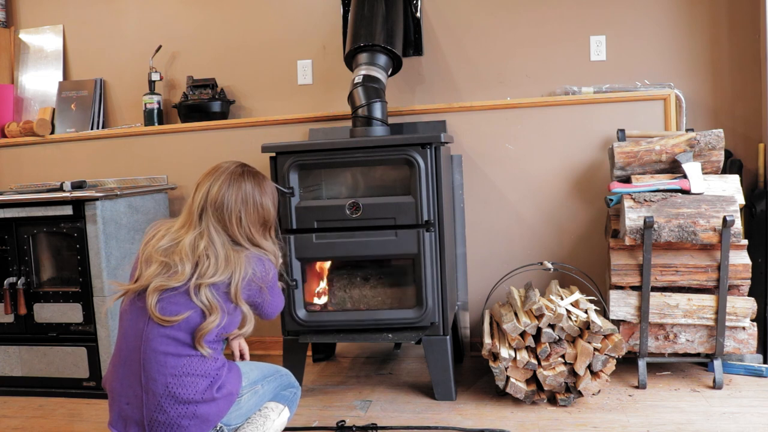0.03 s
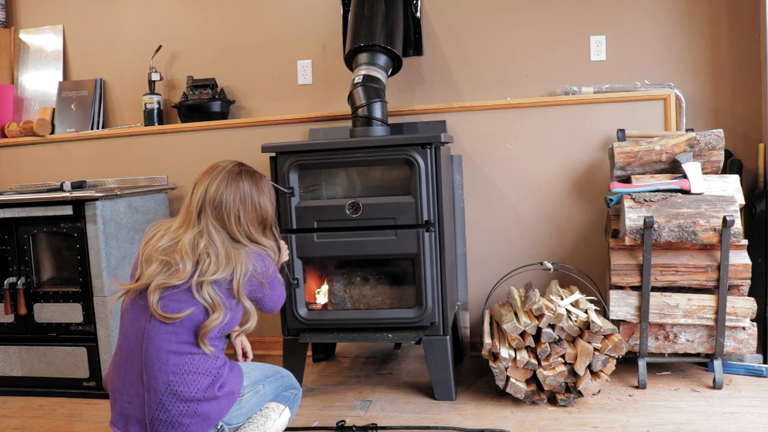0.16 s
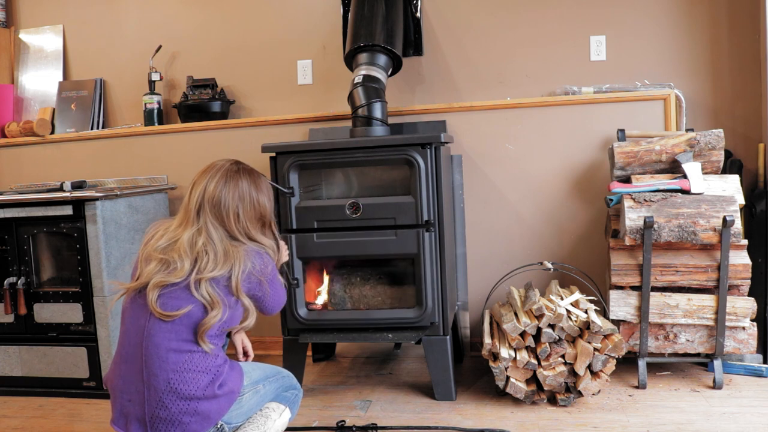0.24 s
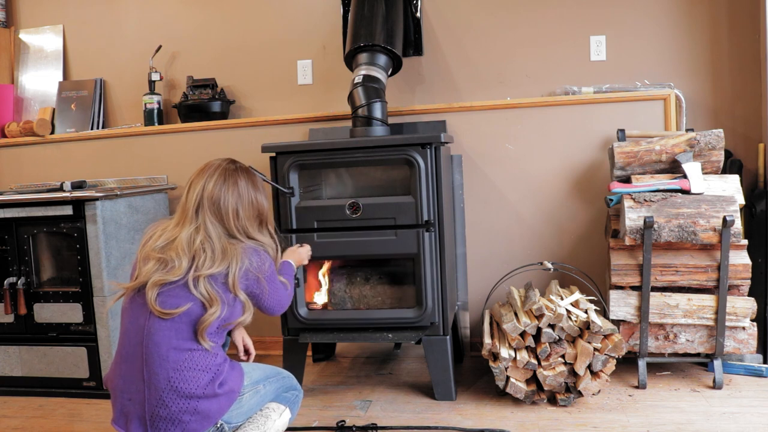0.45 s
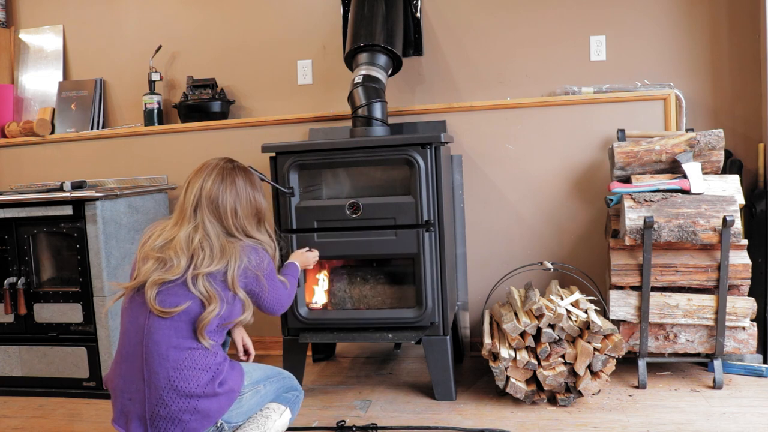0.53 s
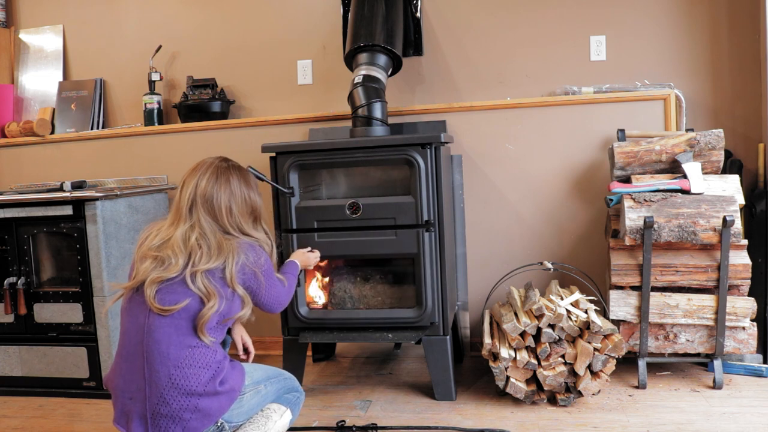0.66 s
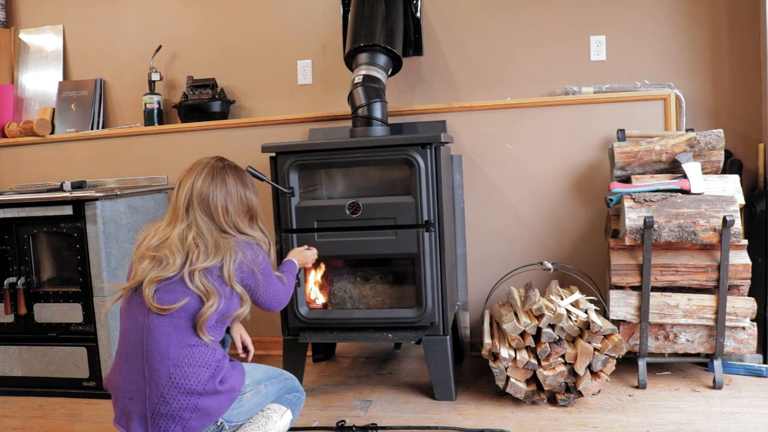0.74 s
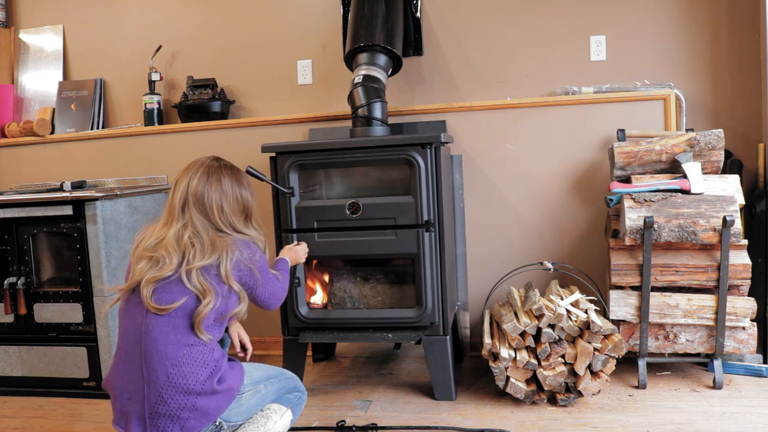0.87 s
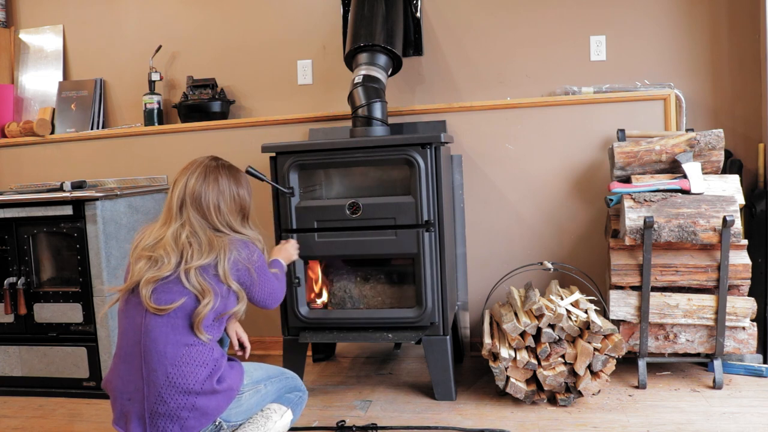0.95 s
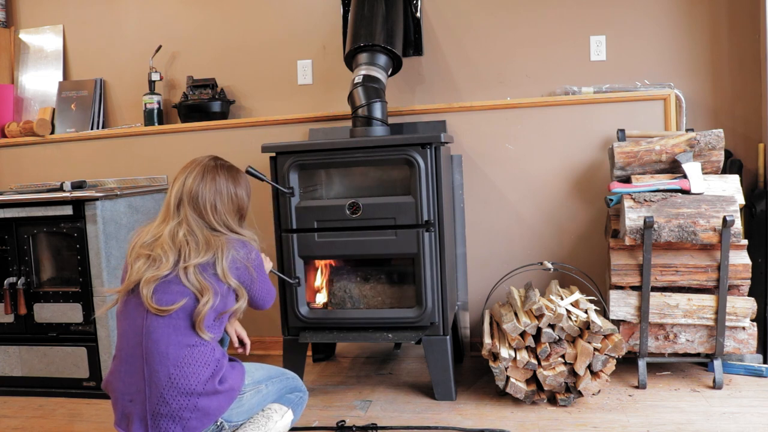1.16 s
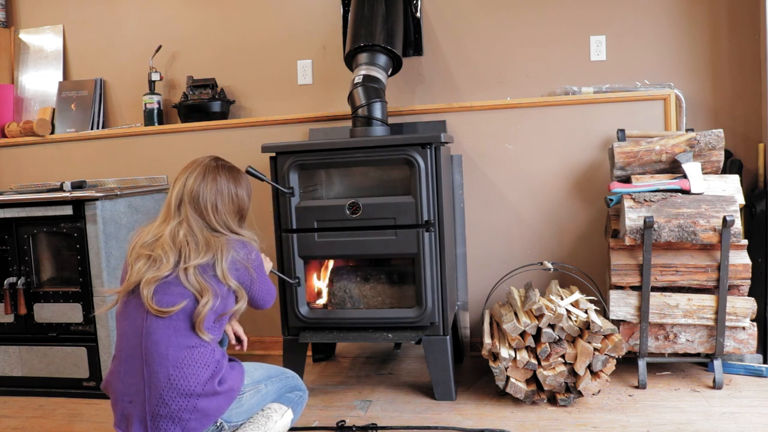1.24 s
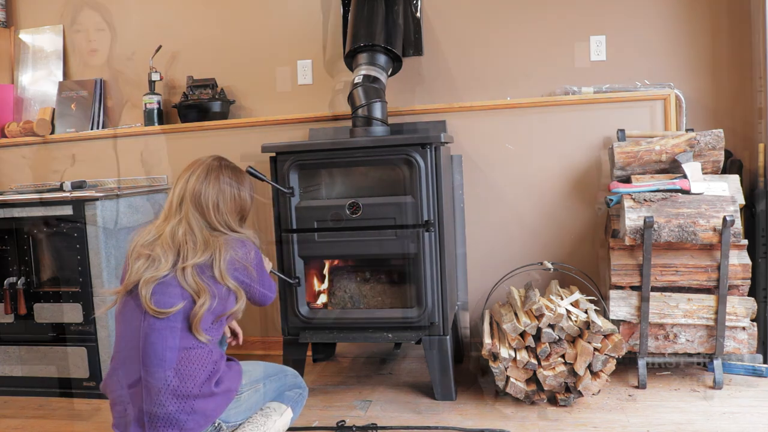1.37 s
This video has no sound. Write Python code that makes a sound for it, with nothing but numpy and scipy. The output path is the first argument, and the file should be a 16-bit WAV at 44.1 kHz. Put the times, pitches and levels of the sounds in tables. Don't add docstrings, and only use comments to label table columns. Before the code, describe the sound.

A heavy iron stove door slams at about 0.2 seconds, just after a faint handle tick: a loud crack, brief plate ring and low hollow firebox boom that lingers. The latch knocks sharply at 0.45. Small ticks and soft thuds come around 0.65 to 0.9, then a light ringing click at 1.2. Quiet living room air and soft fire draught underneath, close stereo pickup, loud blows briefly squashed.

```python
import sys
import numpy as np
from scipy import signal
from scipy.fft import rfft, irfft, next_fast_len
from scipy.io import wavfile
from scipy.ndimage import uniform_filter1d

SR = 44100
rng = np.random.default_rng(int(sys.argv[2]) if len(sys.argv) > 2 else 0)


def bounce(signal):
    frames = np.transpose(np.atleast_2d(signal))
    limited = np.clip(frames, -1, 1)
    pcm = np.round(limited * 32767).astype(np.int16)
    wavfile.write(sys.argv[1], SR, pcm)


def gain_from_decibels(decibels):
    exponent = np.asarray(decibels, float) / 20
    return 10 ** exponent


N = 61739

# freq_hz, density_db_per_hz
FLOOR_SPECTRUM = [(25, -18), (60, -3), (110, -8.5), (170, -8), (400, -13), (1200, -17), (2500, -26.5),
                  (9000, -36.5), (16500, -45)]
# freq_hz, likeness_0_to_1
LIKENESS = [(100, 0.98), (300, 0.98), (700, 0.71), (1500, 0.4), (4000, 0.03), (12000, .15)]
# freq_hz, t60_s
ROOM_T60 = [(200, 0.86), (1000, 0.63), (3000, 0.53), (8000, 0.42), (14000, 0.35)]
# freq_hz, level_db, width_hz, t60_s
FIREBOX_MODES = [(54.7, -4.5, 5.3, 0.92), (87.6, -7, 18, 1.6), (133.1, -2.5, 13, 2.76),
                 (159.3, 3, 16.2, 1.82), (220.3, -2, 8.3, 3.35), (270.3, -6, 12, 1.73),
                 (302.2, -6.5, 13.6, 2.25), (345.8, -11, 13, 2.54), (407.3, -9.5, 23, 2.4),
                 (501.6, -11, 103, 2.31), (666, -15, 77, 2.7), (848, -14, 74, 3), (1170, -9.5, 290, 1.84)]
# start_s, level_db, pitch_hz, t60_s
THUDS = [(.2165, 0.5, 406.7, 0.18), (.2175, -8, 242, 0.084), (.2175, -24, 340, 0.056),
         (.219, -14.5, 658, .08), (.455, -21, 68, 0.16), (.455, -22, 478.5, 0.11), (.458, -29, 777, 0.045),
         (.665, -30.5, 686, 0.12), (.862, -29.5, 711, 0.13), (.885, -19.5, 135.3, 0.11),
         (1.27, -34, 116, 0.17)]
# start_s, level_db, crack_t60_s, pan_db
TICKS = [
    (.194, -39, .03, -2),
    (.443, -19.5, 0.082, -10),
    (0.652, -34.5, 0.19, -1),
    (.698, -34.5, 0.078, -6),
    (.847, -31.5, .06, -4),
    (0.858, -24, 0.088, -3),
]
# start_s, level_db, crack_t60_s, pan_db
LIGHT_CLICK = (1.2005, -22, 0.32, -1.5)
KNOCK = (.4517, -7, 0.1082, -1)
SLAM = (.2096, 0, 0.2242, -0.5)
# freq_hz, density_db_per_hz
TICK_COLOUR = [(700, -38.5), (1500, -6), (2600, 2), (4400, -6.5), (5600, -13), (8500, -14), (16000, -47)]
CLICK_COLOUR = [(350, -38), (600, -10.5), (1230, -22), (1570, -5), (2440, -11), (2990, 0), (5330, -18.5),
                (10300, -20.5), (16000, -44)]
KNOCK_COLOUR = [(400, -28), (800, -3), (1700, 0.5), (2600, -2.5), (4200, -9.5), (5500, -10), (9000, -16),
                (11500, -37), (16000, -35)]
SLAM_COLOUR = [(400, -8.5), (1200, -2), (2100, -13.5), (3050, -4.5), (5000, -13), (7800, -14.5),
               (9500, -10), (11500, -23.5), (16000, -37)]
# freq_hz, level_db, t60_s
HANDLE_MODES = [(750, -7, 0.12), (1675, -26, .05), (1900, -17, 0.045), (2948, -3, 0.084), (3030, -15, 0.41),
                (4240, 0.5, 0.069), (4240, -17, 0.091), (4540, -7.5, 0.037)]
LATCH_MODES = [(735, -16, 0.055), (1650, -8.5, 0.044), (2604, 2, 0.022), (3890, 0.5, 0.031),
               (4370, -0.5, 0.018)]
DOOR_MODES = [(806, -9.5, 0.022), (1310, -9.5, 0.022), (2970, -2, 0.024), (4570, -7, 0.011),
              (6160, -11, 0.022), (9030, -20, 0.025), (9050, -12.5, 0.028), (9990, -8.5, 0.032)]

FLOOR_DB = -43
ROOM_DB, SMALL_ROOM_DB, ROOM_GAP_S = -7.5, -3.5, 0.0024
BOOM_DB, BOOM_RISE_S, BOOM_LAG_S, BOOM_TOP_HZ = -25.5, 0.0033, 0.0061, 1910
SURGE_DB, SURGE_T60_S, KNOCK_BOOM_DB = 12, 0.46, -11
THUD_RISE_S = 0.0019
DOOR_RING_DB, LATCH_RING_DB, HANDLE_RING_DB, TICK_RING_DB = -8.5, -10, -14, -18
CHATTER_S = 0.012
MIC_LOW_HZ, PEAK_LIMIT = 41.8, 0.9
DUCK_FROM_DB, DUCK_SHARE, DUCK_ATTACK_S, DUCK_RELEASE_DB_PER_S = -21.5, 0.5, 0.0077, 103


def rms_one(x):
    return x / np.sqrt(np.mean(x ** 2) + 1e-20)


def at_hz(points, hz):
    table_hz, value = np.array(points).T
    return np.interp(np.log(hz), np.log(table_hz), value)


def widen(mid, side, hz):
    alike = np.clip(at_hz(LIKENESS, hz), 0, 1)
    common = np.sqrt((1 + alike) / 2) * mid
    return common + np.sqrt((1 - alike) / 2) * side * np.array([[1], [-1]])


def coloured(spectrum):
    hz = np.maximum(np.fft.rfftfreq(N, 1 / SR), 1)
    mid, side = rfft(rng.standard_normal((2, N))) * gain_from_decibels(at_hz(spectrum, hz))
    return rms_one(irfft(widen(mid, side, hz), N))


def decay(start_s, t60_s, rise_s=0.0012):
    t_s = np.maximum(np.arange(N) / SR - start_s, 0)
    return (1 - np.exp(-t_s / rise_s)) * gain_from_decibels(-60 * t_s / t60_s)


def blow(row, colour, modes, ring_db):
    start_s, level_db, crack_t60_s, pan_db = row
    out = 0.5 * coloured(colour) * decay(start_s, crack_t60_s)
    late = np.r_[0, rng.random(4)]
    touch_at = ((start_s + CHATTER_S * late) * SR).astype(int)
    for hz, mode_db, t60_s in modes:
        touch_db = ring_db + mode_db - 11.7 * late + rng.normal(0, 2.55, 5)
        touches = np.full(N, 1e-18)
        touches[touch_at] = gain_from_decibels(touch_db) * rng.choice([-1, 1], 5)
        r, w = gain_from_decibels(-60 / (t60_s * SR)), 2 * np.pi * hz / SR
        out += signal.lfilter([0, np.sin(w)], [1, -2 * r * np.cos(w), r * r], touches)
    return gain_from_decibels(level_db) * out * gain_from_decibels([[pan_db / 2], [-pan_db / 2]])


def quiet_room():
    return gain_from_decibels(FLOOR_DB) * coloured(FLOOR_SPECTRUM)


def room(x):
    t_s = np.arange(SR) / SR
    echo = np.zeros((2, SR))
    edges_hz = 60 * 2 ** np.arange(0, 8.4, 0.5)
    for low_hz, high_hz in zip(edges_hz, edges_hz[1:]):
        band = signal.butter(2, [low_hz, high_hz], "band", fs=SR, output="sos")
        mid, side = signal.sosfilt(band, rng.standard_normal((2, SR)))
        echo += widen(mid, side, low_hz) * gain_from_decibels(-60 * t_s / at_hz(ROOM_T60, low_hz))
    echo *= np.clip(t_s / ROOM_GAP_S - 0.5, 0, 1)
    echo /= np.sqrt(np.sum(echo ** 2) / 2)
    size = next_fast_len(2 * N)
    return gain_from_decibels(ROOM_DB) * irfft(rfft(x, size) * rfft(echo, size), size)[:, :N]


def firebox():
    out = np.zeros((2, N))
    start_s = SLAM[0] + BOOM_LAG_S
    surge = gain_from_decibels(SURGE_DB) * decay(start_s, SURGE_T60_S, BOOM_RISE_S)
    for hz, level_db, width_hz, t60_s in FIREBOX_MODES:
        r, w = np.exp(-np.pi * width_hz / SR), 2 * np.pi * hz / SR
        noise = rng.standard_normal((2, N))
        mid, side = signal.lfilter([1, 0, -1], [1, -2 * r * np.cos(w), r * r], noise)
        from_slam = surge + decay(start_s, t60_s, BOOM_RISE_S)
        from_knock = gain_from_decibels(KNOCK_BOOM_DB) * decay(KNOCK[0], t60_s, BOOM_RISE_S)
        out += gain_from_decibels(level_db) * (from_slam + from_knock) * widen(rms_one(mid), rms_one(side), hz)
    return gain_from_decibels(BOOM_DB) * signal.sosfilt(signal.butter(2, BOOM_TOP_HZ, fs=SR, output="sos"), out)


def thuds():
    t_s = np.arange(N) / SR
    out = np.zeros(N)
    for start_s, level_db, hz, t60_s in THUDS:
        tone = np.sin(2 * np.pi * hz * (t_s - start_s))
        out += gain_from_decibels(level_db) * decay(start_s, t60_s, THUD_RISE_S) * tone
    return out


def handle_ticks():
    return sum(blow(row, TICK_COLOUR, LATCH_MODES, TICK_RING_DB) for row in TICKS)


def light_click():
    return blow(LIGHT_CLICK, CLICK_COLOUR, HANDLE_MODES, HANDLE_RING_DB)


def latch_knock():
    return blow(KNOCK, KNOCK_COLOUR, LATCH_MODES, LATCH_RING_DB)


def door_slam():
    return blow(SLAM, SLAM_COLOUR, DOOR_MODES, DOOR_RING_DB)


def scene():
    small = thuds() + handle_ticks() + light_click()
    big = latch_knock() + door_slam()
    reflections = room(big + gain_from_decibels(SMALL_ROOM_DB) * small)
    return quiet_room() + reflections + firebox() + small + big


def top_cut(x):
    return signal.sosfilt(signal.butter(12, 16510, fs=SR, output="sos"), x)


def record(dry):
    dry = signal.sosfilt(signal.butter(2, MIC_LOW_HZ, "high", fs=SR, output="sos"), dry)
    power = uniform_filter1d(np.mean(dry ** 2, axis=0), size=200)
    level_db = 10 * np.log10(power + 1e-12)
    cut_db = DUCK_SHARE * np.maximum(level_db - DUCK_FROM_DB, 0)
    release_db = DUCK_RELEASE_DB_PER_S * np.arange(N) / SR
    cut_db = np.maximum(np.maximum.accumulate(cut_db + release_db) - release_db, 0)
    r = np.exp(-1 / (DUCK_ATTACK_S * SR))
    ducked = dry * gain_from_decibels(-signal.lfilter([1 - r], [1, -r], cut_db))
    mix = PEAK_LIMIT * np.tanh(ducked / PEAK_LIMIT)
    return top_cut(mix)


dry = scene()
out = record(dry)
bounce(out)
```